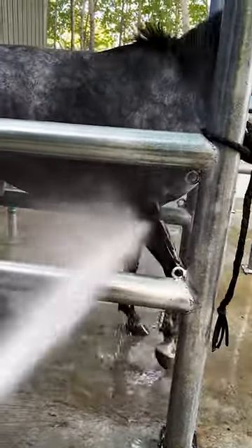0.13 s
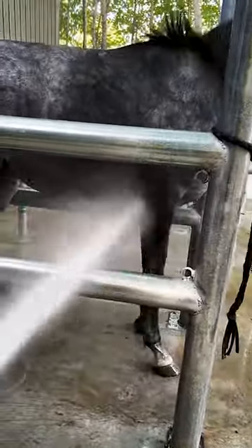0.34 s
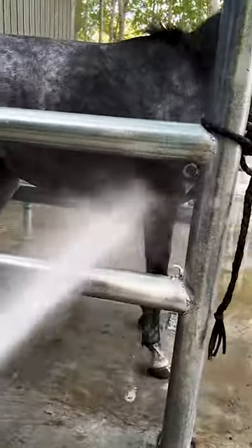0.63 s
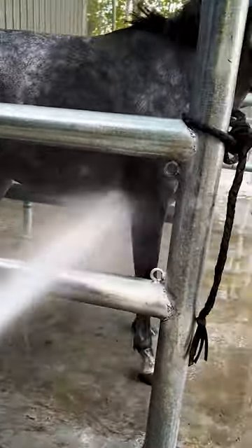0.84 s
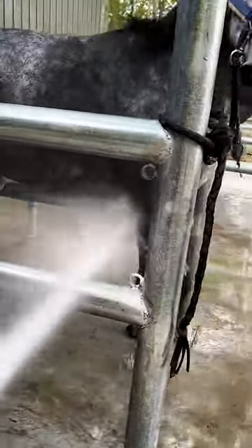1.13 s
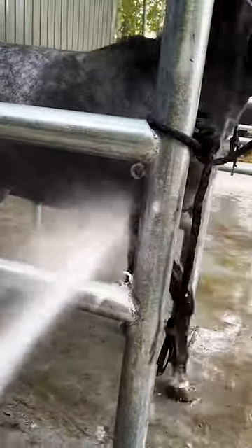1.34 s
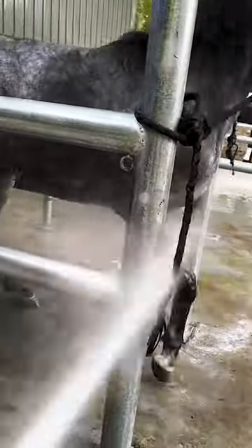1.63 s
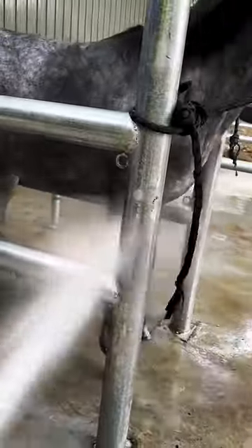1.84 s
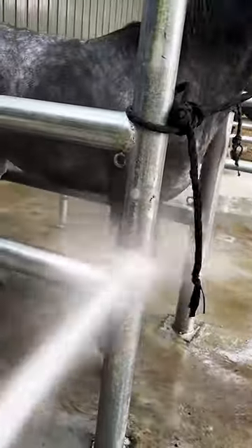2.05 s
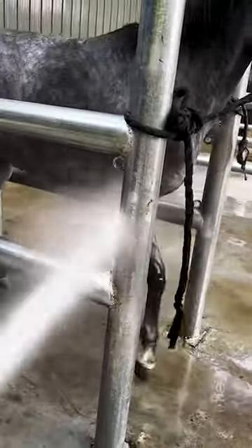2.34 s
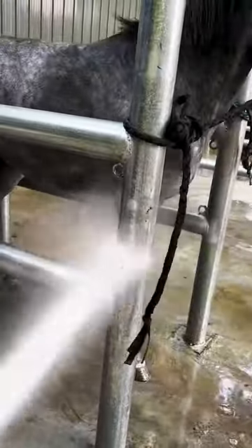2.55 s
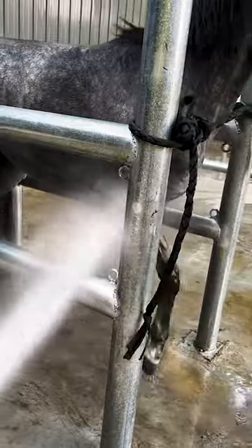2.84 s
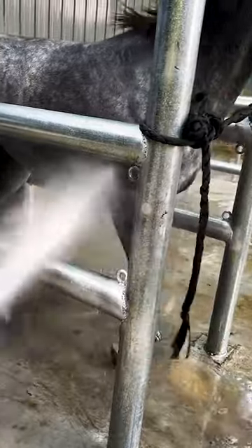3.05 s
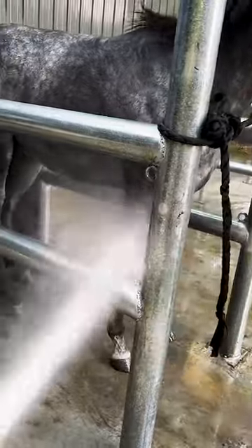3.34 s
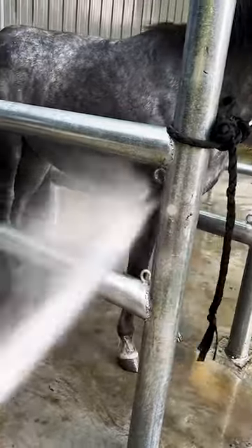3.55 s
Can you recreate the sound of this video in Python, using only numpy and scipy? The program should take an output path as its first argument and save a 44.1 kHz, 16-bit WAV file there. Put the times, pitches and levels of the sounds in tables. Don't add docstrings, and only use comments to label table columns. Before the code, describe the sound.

Strong water jet sprays steadily onto a horse, hissing and splattering, with a few faint knocks

```python
import sys
import numpy as np
from scipy import signal
from scipy.fft import rfft, irfft, next_fast_len
from scipy.io import wavfile
from scipy.ndimage import uniform_filter1d, map_coordinates

SR = 44100
rng = np.random.default_rng(int(sys.argv[2]) if len(sys.argv) > 2 else 0)


def volts(x):
    e = np.asarray(x, float) / 20
    return 10 ** e


def digitize_waveform(pressure):
    field = np.atleast_2d(pressure).T
    bounded = np.clip(field, -1, 1)
    quanta = np.round(bounded * 32767).astype(np.int16)
    wavfile.write(sys.argv[1], SR, quanta)


N = 163611

# (multiple of the shaft speed [x], level [dB rms])
PUMP_TONES = [(1, -40), (2, -38), (5, -46.5), (10, -50.5)]
# (time [s], peak level [dB], ring pitch [Hz], time to fade by 60 dB
# [s])
KNOCKS = [(1.682, -11, 160, .04), (1.698, -8, 1990, .04), (1.742, -13, 170, .04), (1.754, -6, 600, .04),
          (1.848, -3, 1450, .03), (1.851, -8, 520, .03), (1.856, -11, 210, .04), (1.868, 3, 780, .04),
          (1.869, -2, 1200, .03), (2.11, -7, 650, .03), (2.111, -8, 1500, .015), (2.192, -9, 170, .03),
          (1.325, -12, 95, .12), (.7, -11, 1250, .03), (1.517, -10, 650, .03), (.925, -14, 62, .2),
          (2.095, -14, 240, .06), (2.3, -13, 70, .2), (2.79, -14, 150, .08), (2.85, -13, 185, .08),
          (2.88, -13, 63, .2)]
KNOCK_TONES = [.75, .9, 1, 1.15, 1.4, 1.9]
# (time [s], drumming level [dB], splatter level [dB], hiss level [dB])
JET_LEVELS = [(0.0, -24, -25.5, -22), (0.03, -27, -25, -27), (0.67, -25.5, -24.5, -24.5),
              (0.89, -24, -24.5, -25.5), (1.35, -24.5, -24, -26), (1.52, -21.5, -23.5, -26),
              (1.96, -26, -24.5, -27), (2.158, -23.5, -23.5, -27), (2.28, -23.5, -24.5, -24.5),
              (2.71, -23.5, -25, -26), (3.08, -25.5, -24, -25.5), (3.44, -24, -25.5, -25.5),
              (3.71, -22, -22.5, -24)]
# (frequency [Hz], level [dB per Hz])
DRUMMING_COLOUR = [(13, -40), (22, -36), (45, -2.5), (70, 1.5), (149, -2), (260, -4), (286, -3),
                   (362, -8.5), (420, -10), (550, -36.5), (920, -120)]
# (frequency [Hz], level [dB per Hz])
SPLATTER_COLOUR = [(250, -44), (340, -18), (430, -1.5), (700, 2), (1050, -2.5), (2200, -3), (3300, -7),
                   (4400, -10.5)]
# (frequency [Hz], level [dB])
HISS_COLOUR = [(4300, -4.5), (5300, -9), (5700, -7), (6800, -3.5), (8400, 0.5), (9600, -4), (10500, -1.5),
               (11200, -5.5)]
# (frequency [Hz], likeness of the ports [0-1], lag of the left
# [radians], left over right [dB])
PORT_DIFFERENCES = [(71, 0.99, 0.017, -2), (200, 0.97, .2, 5), (324, .8, 0.28, -3.5), (440, 0.4, 0.51, 6.5),
                    (728, .8, 1.5, -0.5), (953, 1, 1.6, -3.5), (1325, 0.56, 0.94, 0.5), (1774, 0.69, 0.44, -1),
                    (2103, 0.27, 0.97, -0.41), (2595, 0.49, 2.9, -0.4), (2774, 0.064, 3.3, -1.6),
                (3500, 0.31, 3.75, -1.2), (3990, 0.16, 1.8, -0.67), (4314, 0.29, 3.2, 0.33),
                (4714, 0.23, 4.3, 0),
                    (7340, 0.75, 0.11, 0), (8000, 1, 0.34, .3), (8300, 0.5, 0.89, .8), (9480, 0.84, 0.42, 0),
              (8800, 0.18, 6.6, 0), (10950, 0.14, 3.8, 0)]
# (frequency [Hz], signal over rounding step [dB])
PHONE_FINENESS = [(90, 34), (250, 24), (800, 14), (1600, 6), (2600, -5), (4000, -5.5), (6000, -5.5),
                  (9000, -4.5)]
# (start [s], length [s], centre frequency [Hz], width [Hz])
MIDDLE_HOLES = [(0, .12, 3920, 640), (2.23, .05, 3980, 480), (2.97, .045, 4150, 850),
                (3.26, .08, 4430, 350), (.19, .04, 4500, 900), (.21, .14, 4650, 650), (.33, .11, 4400, 400),
                (.38, .04, 4100, 600), (.43, .08, 4870, 500), (.47, .05, 3450, 500), (.52, .04, 4330, 600),
                (.57, .15, 4820, 350), (.61, .04, 4900, 700), (.66, .04, 3750, 900), (.67, .07, 3790, 350),
                (.7, .14, 4800, 1050), (.75, .12, 3280, 350), (.8, .04, 3450, 600), (2.89, .04, 4700, 550),
                (3.12, .12, 5500, 280), (.89, .04, 4400, 550), (.91, .1, 4680, 480), (.94, .08, 3600, 380),
                (.99, .08, 5000, 800), (1.03, .09, 5350, 1000), (1.1, .17, 5120, 540),
                (1.18, .12, 3450, 320), (1.26, .08, 5400, 520), (1.33, .05, 5000, 600),
                (1.36, .08, 4620, 600), (1.38, .22, 3650, 280), (1.45, .32, 5060, 720),
                (1.54, .04, 4550, 700), (1.75, .17, 5250, 460), (1.77, .09, 4470, 330),
                (1.9, .09, 5050, 800), (1.91, .04, 4400, 750), (2.05, .13, 5030, 700),
                (2.09, .09, 4650, 500), (2.12, .06, 3680, 350), (2.37, .05, 4950, 750),
                (2.48, .17, 5200, 380), (2.67, .07, 4750, 420), (2.82, .14, 4820, 300),
                (2.98, .12, 4080, 400), (3.08, .21, 4900, 320), (3.16, .18, 3830, 480),
                (3.38, .1, 5080, 500), (3.49, .08, 3930, 430), (3.55, .16, 4880, 420)]
# (frequency [Hz], width [Hz], extra step size [dB])
THIN_SIDE = [(1150, 120, 14), (1680, 200, 17), (4300, 400, 1)]
# (frequency [Hz], gain over the copied band [dB])
REBUILT_TREBLE = [(11300, 6), (11900, 2), (12500, -1), (13300, -6.5), (14000, -4.5), (14700, -6),
                  (15700, -2)]


def unit(x):
    return x / np.sqrt(np.mean(x ** 2) + 1e-20)


def along(points, hz, column=1):
    p = np.transpose(points)
    return np.interp(np.log(hz + 1), np.log(p[0] + 1), p[column])


def wobble(rate):
    knots = rng.standard_normal(int(N * 40 / SR) + 4)
    return map_coordinates(knots, [np.arange(N) * min(rate, 39) / SR])


def filtered(x, response):
    m = next_fast_len(N + 8192)
    return irfft(rfft(x, m) * response(np.fft.rfftfreq(m, 1 / SR)), m)[..., :N]


def pump():
    shaft_hz = 144.2
    turn = 2 * np.pi * shaft_hz * np.cumsum(1 + 0.00168 * wobble(2.3)) / SR
    at_ports = turn + np.array([[0], [0.5]])
    hum = np.zeros((2, N))
    for multiple, db in PUMP_TONES:
        hum += np.sqrt(2) * volts(db + 2.0 * wobble(5)) * np.sin(multiple * at_ports)
    return hum


def hooves():
    out = np.zeros((2, N))
    t = np.arange(SR // 5) / SR
    for time, db, hz, fade_s in KNOCKS:
        ring = np.zeros(len(t))
        for ratio in KNOCK_TONES:
            tone_db = 1.5 * rng.standard_normal() - 20 * abs(np.log2(ratio))
            ring += volts(tone_db) * np.sin(2 * np.pi * hz * ratio * t)
        onset = 1 - np.exp(-t / 0.0016)
        knock = ring * volts(db - 5 - 60 * t / fade_s) * onset
        i = round(time * SR)
        out[0, i:i + len(t)] += knock
        for late_s, echo_db in [(0.0085, -7), (0.014, -10), (0.024, -13)]:
            j = i + round(late_s * SR)
            out[:, j:j + len(t)] += volts(echo_db) * knock * [[0.6], [0.25]]
    return filtered(out, lambda hz: 1 / (1 + (42 / (hz + 1)) ** 6))


def rush(colour, patchy_db):
    z = signal.stft(rng.standard_normal((2, N)), nperseg=512)[2]
    patches = uniform_filter1d(rng.standard_normal(z.shape[1:]), 6, 0)
    patches = unit(uniform_filter1d(patches, 10, 1))
    pair = signal.istft(z * volts(patchy_db * patches), nperseg=512)[1][:, :N]
    low_hz, high_hz = colour[0][0], colour[-1][0]

    def response(hz):
        inside = (hz > low_hz) & (hz < 1.25 * high_hz)
        fall_db = -60 * np.log2(np.maximum(hz / high_hz, 1))
        return volts(along(colour, hz) + fall_db) * inside
    return unit(filtered(pair, response))


def jet():
    time, *columns = np.transpose(JET_LEVELS)
    drum_db, splat_db, hiss_db = [np.interp(np.arange(N) / SR, time, c) for c in columns]
    shared = wobble(7.76)
    drum_db = drum_db + 0.39 * shared + 0.67 * wobble(6.77)
    splat_db = splat_db + 2.5 + 0.4 * shared + 0.5 * wobble(9)
    hiss_db = hiss_db + 2.0 + 0.29 * shared + 0.23 * wobble(14)
    drumming = volts(drum_db) * rush(DRUMMING_COLOUR, patchy_db=0.5)
    splatter = volts(splat_db) * rush(SPLATTER_COLOUR, patchy_db=1.36)
    hiss = volts(hiss_db) * rush(HISS_COLOUR, patchy_db=1.35)
    return drumming + splatter + hiss


def ports(pair):
    table = PORT_DIFFERENCES

    def side(sign):
        def response(hz):
            blend = np.arccos(np.clip(along(table, hz), 0, 1)) / 2
            gain = volts(sign * along(table, hz, column=3) / 2)
            lag = np.exp(-0.5j * sign * along(table, hz, column=2))
            return gain * lag * np.array([np.cos(blend), sign * np.sin(blend)])
        return filtered(pair, response).sum(0)
    return np.array([side(1), side(-0.95)])


def scene():
    return ports(jet() + hooves()) + pump()


def phone(x):
    frame, offset, band = 1024, 480, 4
    n, k = np.arange(2 * frame), np.arange(frame)
    window = np.sin(np.pi * (n[:, None] + 0.5) / (2 * frame))
    basis = window * np.cos(np.pi / frame * (n[:, None] + 0.5 + frame / 2) * (k + 0.5))
    frames, bands = N // frame + 3, frame // band
    mid_side = np.array([x[0] + x[1], x[0] - x[1]]) / 2
    padded = np.pad(mid_side, ((0, 0), (2 * frame - offset, 4 * frame)))
    where = np.arange(frames)[:, None] * frame + n
    lines = (padded[:, where].reshape(-1, 2 * frame) @ basis).reshape(2, frames, frame)
    hz = (k + 0.5) * SR / 2 / frame
    band_hz = hz.reshape(-1, band).mean(1)
    t = (np.arange(frames) * frame + offset - frame) / SR

    mono = (hz > 5100) & (hz < 7480)
    lines[0][:, mono] = np.sign(lines[0][:, mono]) * np.hypot(*lines[:, :, mono])
    lines[1][:, mono] = 0
    power = np.mean(lines.reshape(2, frames, -1, band) ** 2, (0, 1, 3))
    level = np.sqrt(power * (1 + mono.reshape(-1, band).mean(1)) + 1e-12)

    fine = unit(uniform_filter1d(rng.standard_normal((2, frames, bands)), size=7, axis=1))
    wander = unit(fine + unit(uniform_filter1d(fine, size=4, axis=2)) / 2)
    ragged = np.exp(0.07 * wander[0][:, 8:9])
    holes = np.zeros((frames, bands))
    for start, length, centre, width in MIDDLE_HOLES:
        during = ((t > start) & (t < start + length))[:, None]
        holes += during * np.exp(-((band_hz - centre) / (0.56 * width * ragged)) ** 6)
    thin_db = sum(db * np.exp(-((band_hz - f) / w) ** 2) for f, w, db in THIN_SIDE)
    thin_db = thin_db * np.clip(0.3 + wander[1], 0, 1.5)
    fineness_db = along(PHONE_FINENESS, band_hz)
    swing_db = 2.8 * np.clip(1 - fineness_db / 12, 0, 2)
    step_db = swing_db * wander + np.array([22 * holes, thin_db]) - fineness_db
    step = np.repeat(level * volts(step_db), band, 2)
    lines = np.sign(lines) * step * np.floor((abs(lines) / step) ** 0.75 + 0.4054) ** (4 / 3)

    top = np.flatnonzero((hz >= 11250) & (hz < 15750))
    shift = round(6200 * 2 * frame / SR)
    lines[..., top] = lines[..., top - shift] * volts(along(REBUILT_TREBLE, hz[top]))
    flips = np.sign(rng.standard_normal((frames, bands))) * volts(0.6 * wander[0][:, :1])
    lines[..., top] *= np.repeat(flips, band, 1)[:, top]
    fade_in = np.interp(hz[top], (11550, 12050), [0, 1])
    refill = volts(-5) * fade_in * lines[..., top].std(1, keepdims=True)
    lines[..., top] += refill * rng.standard_normal(lines[..., top].shape)
    lines[..., top[-1] + 1:] = 0

    def overlap(v):
        total = np.bincount(where.ravel(), (v @ basis.T).ravel())
        return total[2 * frame - offset:][:N] * 2 / frame
    mid, side = overlap(lines[0]), overlap(lines[1])
    return np.array([mid + side, mid - side])


def top_cut(x):
    return signal.sosfilt(signal.butter(12, 17020, fs=SR, output="sos"), x)


def record(dry):
    mix = phone(dry)
    return top_cut(mix)


dry = scene()
out = record(dry)
digitize_waveform(out)
```